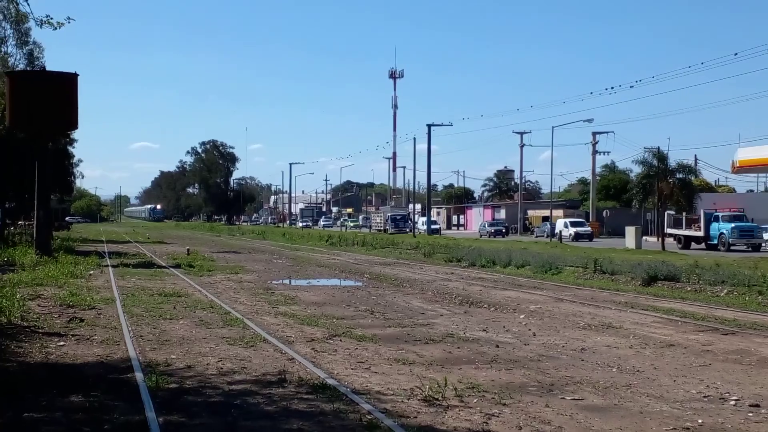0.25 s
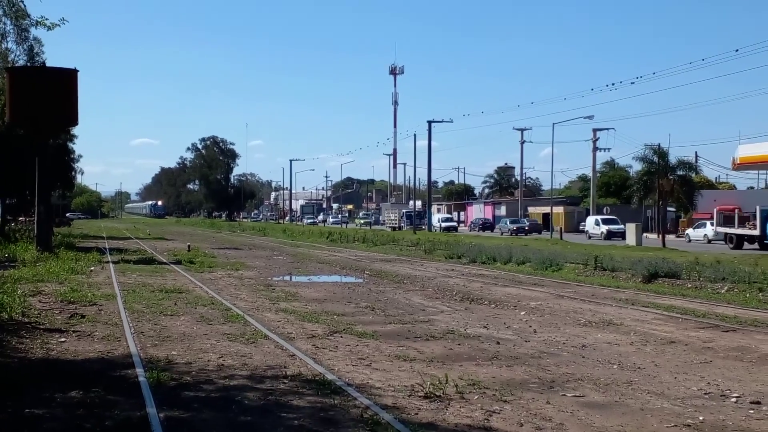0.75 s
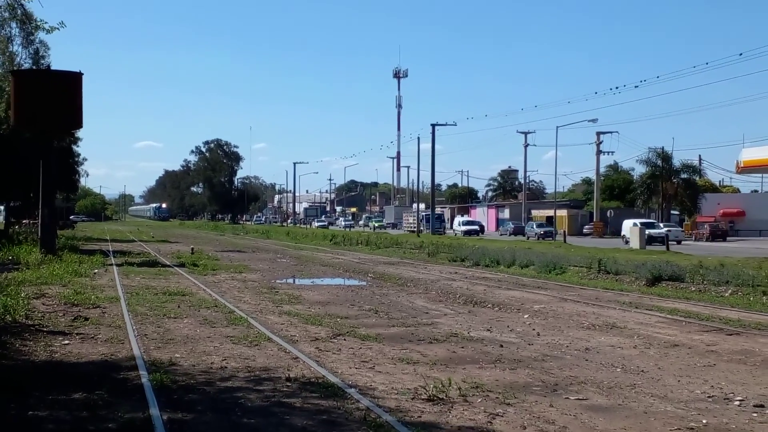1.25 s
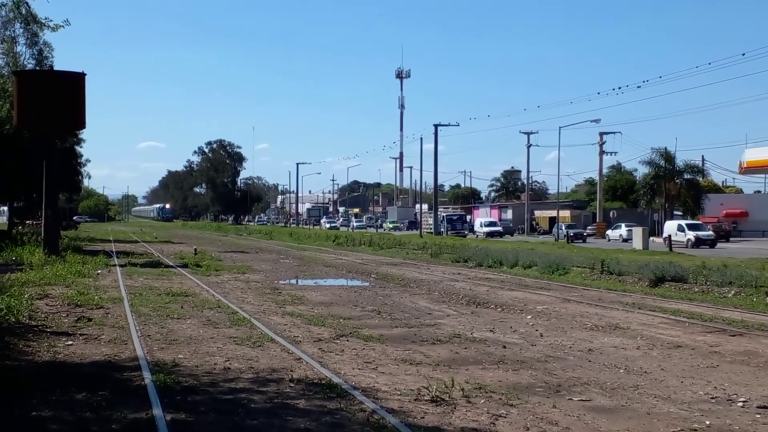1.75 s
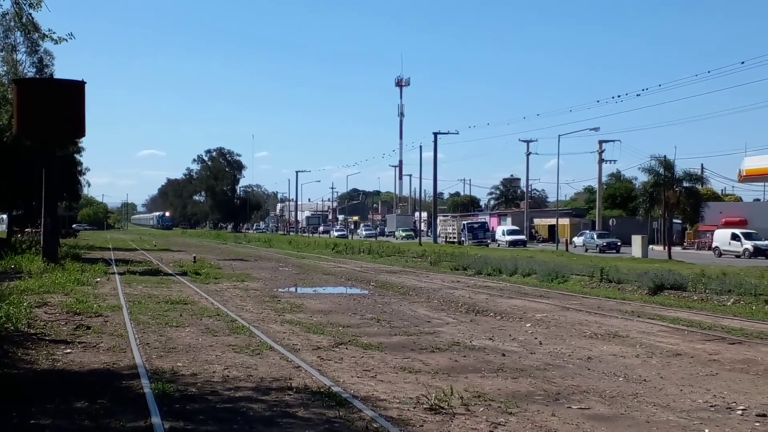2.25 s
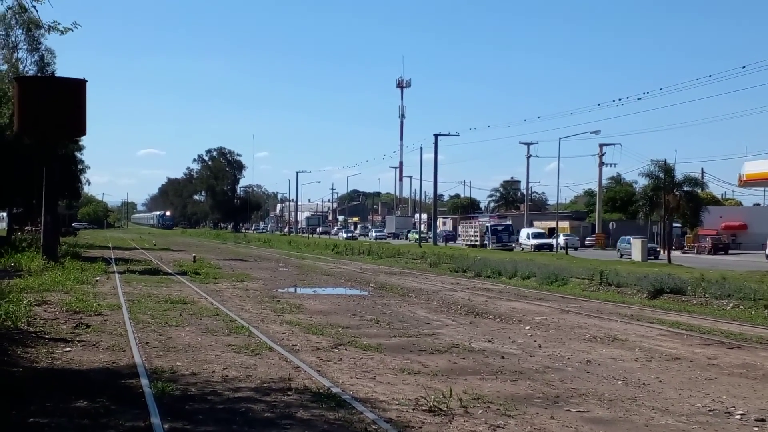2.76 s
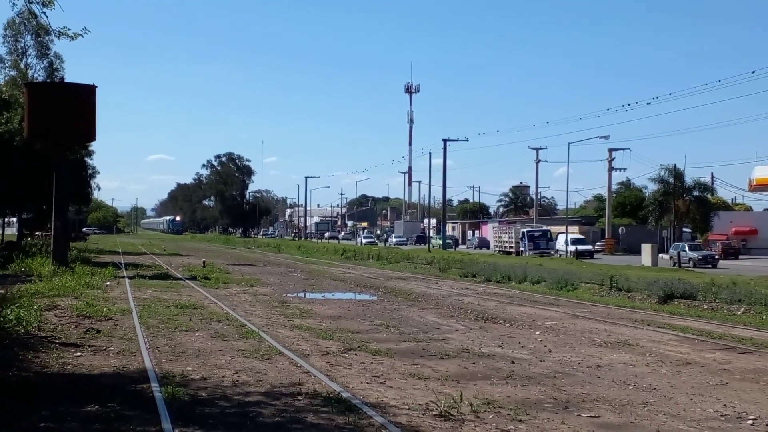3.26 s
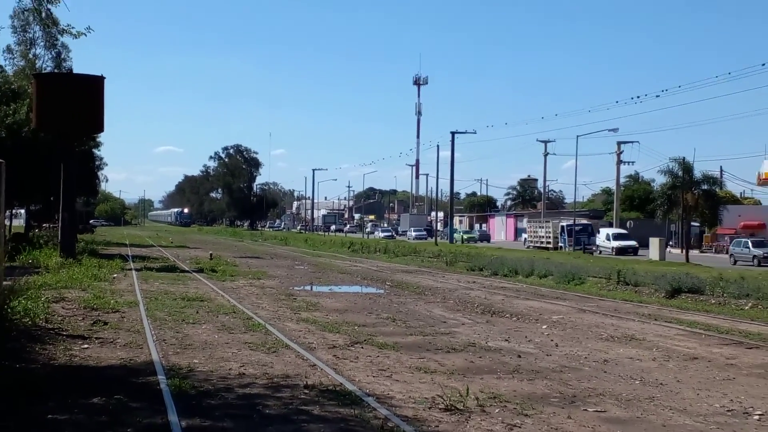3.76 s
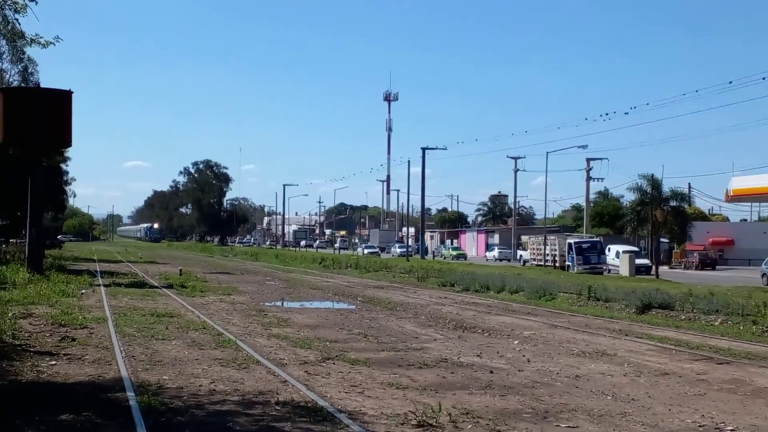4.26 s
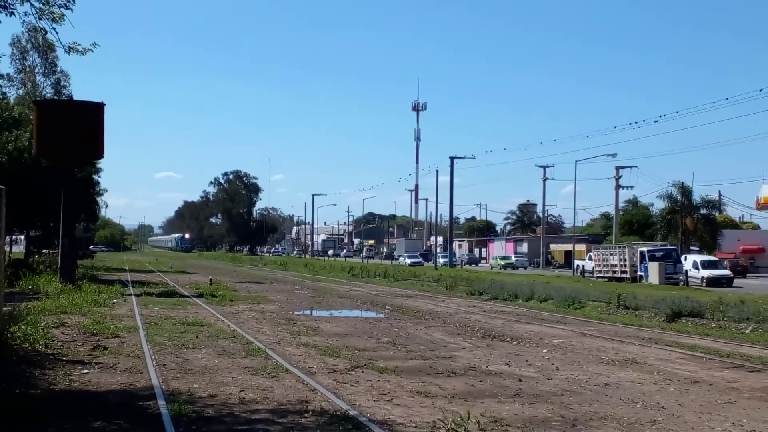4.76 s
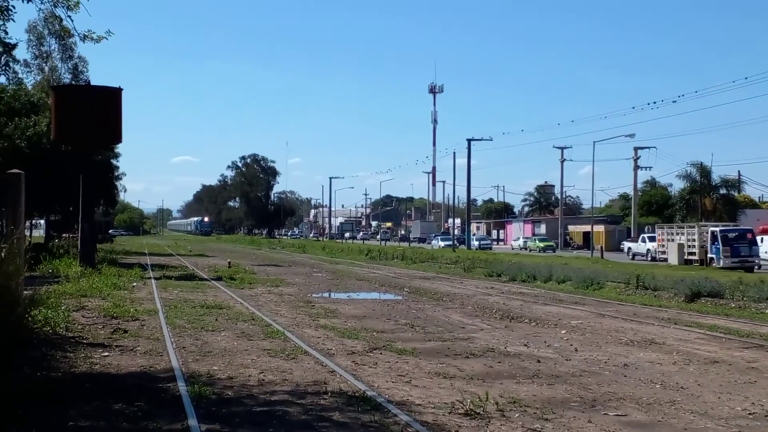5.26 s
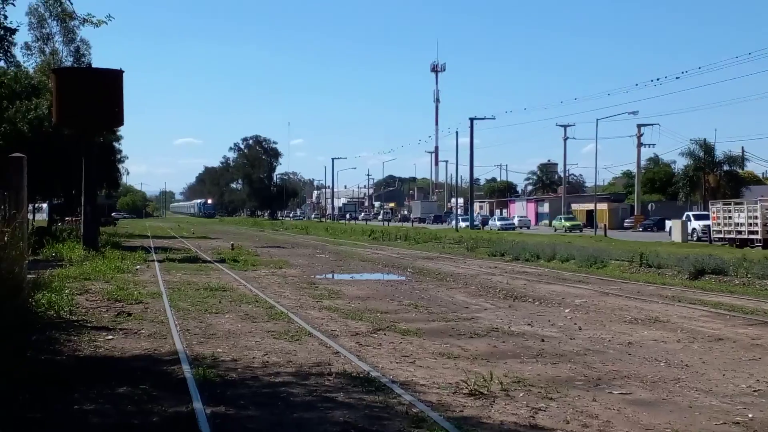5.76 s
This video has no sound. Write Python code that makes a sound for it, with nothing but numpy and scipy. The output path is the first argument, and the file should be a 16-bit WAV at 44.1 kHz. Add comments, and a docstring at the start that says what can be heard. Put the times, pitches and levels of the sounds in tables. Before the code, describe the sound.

Busy road traffic with a low diesel rumble, a fading horn, a squealing brake, then wind gusts thumping the microphone as a truck approaches.

```python
"""A busy road across open ground: shaped noise makes tyre roar, and a diesel idles on crank multiples.
At first a car horn's partials die away; then come faint chirps, rustles and a brake squealing on one mode.
Hiss pulses as a diesel clatters by, and a second brake tone whistles thinly.
In the second half two gusts buffet the microphone with flutter, gliding eddies and sharp pressure kicks.
A truck draws near as swelling noise, with a bright rush, a puff of air and at the end a climbing note."""
import sys
import numpy as np
from scipy import signal
from scipy.fft import rfft, irfft
from scipy.io import wavfile

SR = 44100
rng = np.random.default_rng(int(sys.argv[2]) if len(sys.argv) > 2 else 0)


def generate_wav(sig):
    """Save sig (samples, or channels by samples) to the path in sys.argv[1] as 16-bit PCM at SR."""
    pcm = np.round(np.clip(np.atleast_2d(sig).T, -1, 1) * 32767).astype(np.int16)
    wavfile.write(sys.argv[1], SR, pcm)


N = 264600
TIME = np.arange(N) / SR


def from_db(db):
    """Amplitude ratio: twenty decibels are a factor of ten."""
    return 10 ** (np.asarray(db) / 20)


def rms_one(x):
    """Normalisation: mean power becomes 1."""
    return x / np.sqrt(np.mean(x ** 2) + 1e-20)


def in_time(rows):
    """Linear interpolation: each column of a curve at every sample."""
    s, *columns = np.transpose(rows)
    return [np.interp(TIME, s, c) for c in columns]


def drift(rate):
    """Low-passed noise: a smooth random wander of spread 1, about this many turns a second."""
    step = 40  # the wander is computed at every 40th sample
    settling = 2000
    pole = np.exp(-2 * np.pi * rate * step / SR)
    white = rng.standard_normal(N // step + settling + 2)
    slow = signal.lfilter([1], [1, -2 * pole, pole * pole], white)[settling:]
    return np.interp(np.arange(N) / step, np.arange(len(slow)), rms_one(slow))


def noise(spectrum):
    """Spectral shaping: noise of a given colour, rms 1, falling steeply outside the listed range."""
    hz, db = np.transpose(spectrum)
    f = np.maximum(np.arange(N // 2 + 1) * SR / N, 1)
    low_skirt = 1 / (1 + (hz[0] / f / np.sqrt(2)) ** 4)
    high_skirt = 1 / (1 + (f / hz[-1] / np.sqrt(2)) ** 4)
    gain = from_db(np.interp(np.log(f), np.log(hz), db)) * low_skirt * high_skirt
    return rms_one(irfft(rfft(rng.standard_normal(N)) * gain, N))


def tone(hz):
    """Phase is the integral of frequency: a sine of rms 1 that follows a pitch curve."""
    turns = np.cumsum(hz * np.ones(N)) / SR + rng.random()
    return np.sqrt(2) * np.sin(2 * np.pi * turns)


def coloured_swell(gain, spectrum, waver_db):
    """Amplitude modulation: noise of one colour at a wavering gain."""
    return gain * from_db(waver_db * drift(13.6)) * noise(spectrum)


def swell(start_s, attack_s, hold_s, release_db_per_s):
    """Envelope: a gain rises smoothly to 1, holds and decays exponentially."""
    age = TIME - start_s
    rise = np.sin(np.pi / 2 * np.clip(age / attack_s, 0, 1)) ** 2
    return rise * from_db(-release_db_per_s * np.maximum(age - attack_s - hold_s, 0))


def bell(centre_s, width_s):
    """Gaussian envelope: a gain rises to 1 at its centre and falls alike on both sides."""
    return np.exp(-((TIME - centre_s) / width_s) ** 2)


def shimmer(x, depth_db, count):
    """Turbulent scattering: moving air lets each narrow band swell and fade by itself."""
    spectrum, out = rfft(x), 0
    log_hz = np.log(np.arange(len(spectrum)) * SR / N + 1)
    place = np.interp(log_hz, np.log([500, 16000]), [0, count - 1])
    for k in range(count):
        band = irfft(spectrum * np.maximum(1 - np.abs(place - k), 0), N)
        out = out + band * from_db(depth_db * drift(7.7))
    return rms_one(out)


# faint airy top, shared by the background and the leaf ticks: frequency_hz, relative_db_per_hz
AIR = [(8500, 3), (11000, -2.5), (13500, 1.5), (15500, -2.5)]


def airy_noise():
    """Broadband turbulence: noise in the top octave, rms 1."""
    return noise(AIR)


# two-note horn: partial_hz, level_db (before the horn's common level and fade)
HORN = [(994.5, -36), (1484, -49.5), (1873, -58), (1905, -52.5), (1983, -48.5), (2384, -54.5),
        (2477, -53.5), (2940, -64), (3483, -66)]
# echo of the released horn: time_s, fade_db
HORN_FADE = [(.02, 0), (.07, -2.5), (.11, -1.5), (.14, -5), (.19, -8.5), (.27, -17), (.35, -28), (.7, -60)]


def horn(level_db, waver_db, wander):
    """Additive synthesis: reed partials fade together, each slightly blurred on its way through the air."""
    partials = 0
    for hz, db in HORN:
        blurred_hz = hz * (1 + wander * drift(30))
        partials = partials + from_db(db + waver_db * drift(24)) * tone(blurred_hz)
    return from_db(level_db + in_time(HORN_FADE)[0]) * partials


# loudness shared by the idling diesel and the rumble: time_s, relative_db
ENGINE_LOUDNESS = [(0, -1.5), (.6, -.5), (3.5, -1), (4.4, -5), (5.5, -2), (6, -4.5)]


def engine_gain():
    """Common envelope: the engines' loudness as a gain."""
    return from_db(in_time(ENGINE_LOUDNESS)[0])


# idling diesel: multiple of the crank rate, level_db (before the engine loudness)
ENGINE_ORDERS = [(6, -36), (11, -34), (12, -34.5), (13, -35.5), (15, -57.5), (18, -41), (24, -48),
                 (31, -63.5)]
CRANK_HZ = 11.13
BOOM_ORDER = 9  # the strongest order, which booms in the exhaust pipe


def idling_diesel(boom_db, lurch, half_lurch, throb, speed_wander, waver_db, order_wander_hz):
    """Engine orders: tones sit on crank multiples, and uneven turning warbles the boom."""
    crank = CRANK_HZ * (1 + speed_wander * drift(1))
    uneven = crank * (1 + lurch * tone(crank) + half_lurch * tone(2 * crank))
    firing = tone(3 * crank)
    boom_gain = from_db(boom_db + waver_db * drift(2.5)) * (1 + throb * firing)
    exhaust = boom_gain * tone(BOOM_ORDER * uneven)
    for order, db in ENGINE_ORDERS:
        order_hz = order * crank + order_wander_hz * drift(1.44)
        exhaust = exhaust + from_db(db + waver_db * drift(2.7)) * tone(order_hz)
    return engine_gain() * exhaust


# colour of the rumble: frequency_hz, relative_db_per_hz
RUMBLE = [(37, -22.5), (42, -11.5), (52, -5), (65, 3), (100, -1.5), (150, -1), (180, -9), (270, -4.5),
          (350, -11.5), (450, -19), (800, -30.5)]


def engine_rumble(level_db):
    """Incoherent sum: many engines together make low noise that follows the engine loudness."""
    return coloured_swell(from_db(level_db) * engine_gain(), RUMBLE, waver_db=1.54)


# vehicles going by: nearest_s, time to come or go by 3 dB (s; its sign is ignored),
# roar_db (before the common tyre lift), hiss_db
PASSES = [(1.1, 1.5, -42.5, -61.5), (2.0, 0.66, -42, -52.5), (3.07, 0.26, -41.5, -52),
          (4.35, 0.2, -48, -53.5), (5.43, -0.83, -50.5, -59)]
FAR_ROAR_DB, FAR_HISS_DB = -44, -59.5  # far traffic; the roar is before the common tyre lift


def traffic_gains():
    """Inverse-square law: each vehicle's power falls with distance squared, on top of far traffic."""
    roar_power, hiss_power = from_db(FAR_ROAR_DB) ** 2, from_db(FAR_HISS_DB) ** 2
    for s, width_s, roar_db, hiss_db in PASSES:
        nearness = 1 / (1 + ((TIME - s) / width_s) ** 2)
        roar_power = roar_power + nearness * from_db(roar_db) ** 2
        hiss_power = hiss_power + nearness * from_db(hiss_db) ** 2
    return np.sqrt(roar_power), np.sqrt(hiss_power)


# colour of tyre roar: frequency_hz, relative_db_per_hz
TYRES = [(200, -10.5), (450, 2), (750, 0), (1000, 0), (1220, 1), (1600, -2), (1950, -0.5), (2200, -6),
         (2450, -7), (2800, -17.5), (4000, -37), (6000, -38.5)]
# colour of hiss: frequency_hz, relative_db_per_hz
HISS = [(1500, -4.5), (3000, 4), (3700, 0.5), (4300, -2.5), (5000, -10), (5800, -6.5), (6500, -10.5),
        (7300, -6.5), (8000, -16), (11000, -23.5), (14000, -19.5), (16000, -21)]
KNOCK_HZ, KNOCK_AT_S = 11.68, 2.003  # knock rate and the start of one knock
KNOCK_RISE_S, KNOCK_SPREAD_DB = .008, 2.0


def passing_vehicles(tyre_db, air_db, shimmer_db, knock_depth, knock_decay_s):
    """Periodic modulation: beside steady tyre roar, hiss pulses with a diesel's loudest cylinder."""
    roar_gain, hiss_gain = traffic_gains()
    roar = roar_gain * from_db(tyre_db) * shimmer(noise(TYRES), shimmer_db, count=24)
    age = (TIME - KNOCK_AT_S) % (1 / KNOCK_HZ)
    knocks = (1 - np.exp(-age / KNOCK_RISE_S)) * np.exp(-age / knock_decay_s)
    knocks = knocks * from_db(KNOCK_SPREAD_DB * drift(7.2))
    pulses = rms_one(1 + knock_depth * knocks)
    hiss = hiss_gain * pulses * shimmer(noise(HISS), shimmer_db, count=24)
    air = from_db(air_db + shimmer_db * drift(10)) * airy_noise()
    return roar + hiss + air


# colour of the trucks' drone: frequency_hz, relative_db_per_hz
DRONE = [(250, -5.5), (300, 0), (345, -0.5), (400, -8.5), (470, -16.5)]


def truck_drone(far_db, near_db, rev_db):
    """Amplitude envelope: far drone grows as a truck draws near, then as it opens its throttle."""
    nearing = swell(start_s=3.98, attack_s=0.69, hold_s=0.99, release_db_per_s=25)
    throttle = swell(start_s=5.74, attack_s=0.24, hold_s=.1, release_db_per_s=20)
    gain = from_db(far_db) + from_db(near_db) * nearing + from_db(rev_db) * throttle
    return coloured_swell(gain, DRONE, waver_db=4.0)


# gusts at the microphone: start_s, hold_s, flutter_db, slow_pressure_db
GUSTS = [(1.296, 0.38, -47.5, -29), (2.9, 0.25, -42.5, -33), (3.24, 0.69, -29.5, -29),
         (4.797, 0.32, -34, -28), (5.3, 0.15, -41, -29)]
GUST_ATTACK_S, GUST_RELEASE_DB_PER_S = 0.17, 90.5
CALM_FLUTTER_DB, CALM_SWAY_DB = -50.5, -52


def wind_gains():
    """Power addition: each gust swells over the calm in flutter and in slow pressure."""
    flutter, sway = from_db(CALM_FLUTTER_DB), from_db(CALM_SWAY_DB)
    for s, hold_s, flutter_db, sway_db in GUSTS:
        gust = swell(s, GUST_ATTACK_S, hold_s, GUST_RELEASE_DB_PER_S)
        flutter = np.hypot(flutter, from_db(flutter_db) * gust)
        sway = np.hypot(sway, from_db(sway_db) * gust)
    return flutter, sway


TYPICAL_EDDY_HZ, TYPICAL_EDDY_S = 250, .01
WEAK_EDDIES_PER_S = 18
WEAK_EDDY_DB, WEAK_EDDY_SPREAD_DB = 8, 3.5  # above the flutter


def weak_eddies(flutter):
    """Random turbulence: rows of centre_s, peak_db, pitch_hz, length_s, glide_octaves follow the wind."""
    count = int(WEAK_EDDIES_PER_S * N / SR)
    when, strength, pitch, length, glide = rng.uniform(-1.2, 1, (count, 5)).T
    s = (np.arange(count) + .5 + .5 * when) / WEAK_EDDIES_PER_S
    wind_db = 20 * np.log10(np.interp(s, TIME, flutter))
    db = wind_db + WEAK_EDDY_DB + WEAK_EDDY_SPREAD_DB * strength
    hz = TYPICAL_EDDY_HZ * 2 ** (.5 * pitch)
    length_s = TYPICAL_EDDY_S * 2 ** length
    return list(zip(s, db, hz, length_s, .5 * glide))


# the strongest eddies: centre_s, peak_db, pitch_hz, length_s, glide (octaves over that length)
EDDIES = [(3.342, -10.5, 259.2, .012, -.2), (3.353, -11, 236, .015, -.5), (3.431, -16, 151, .009, 0),
          (3.494, -12.5, 120, .016, 0), (3.544, -13.5, 287.6, .012, 0), (3.584, -8.5, 229.7, .015, -.3),
          (3.651, -11.5, 281.4, .014, -.2), (3.671, -14, 230, .014, -.2), (3.699, -9, 134.7, .017, .2),
          (3.717, -11.5, 235, 0.017, .2), (3.836, -13.5, 110, .014, -.3), (3.869, -15.5, 369, .016, .2),
          (3.925, -18, 302, 0.0085, 0), (4.058, -7, 310.5, 0.012, 0), (4.077, -11, 136, .012, -.5),
          (4.11, -16, 288, .024, -.4), (4.802, -18, 343, 0.013, -.2), (4.814, -10, 138, .011, 0),
          (4.923, -19.5, 392, .027, .3), (4.955, -20.5, 381, 0.023, -.2), (5.041, -14.5, 329, .013, -.4),
          (5.056, -10.5, 136, .016, -.3), (5.08, -12, 163, 0.008, 0), (5.184, -12.5, 442, 0.012, -.15),
          (5.221, -11, 303.7, .017, .25), (5.291, -10, 125.3, .013, 0.0044)]
# a ripple's level relative to its eddy's peak grows with pitch and shrinks with length
RIPPLE_DB, RIPPLE_DB_PER_OCTAVE, RIPPLE_LOSS_DB_PER_DOUBLING = -18, 7, 4.5


def eddies(flutter, ripple_hz, pitch_spread, ripple_spread):
    """Vortex pressure: each eddy gives the port a few uneven, gliding swings and a faster ripple."""
    rows = EDDIES + weak_eddies(flutter)
    out, swing, fine = np.zeros(N), drift(144.0), drift(166.0)
    for (s, db, hz, length, glide), turns in zip(rows, rng.random((len(rows), 2))):
        near = np.abs(TIME - s) < 2 * length
        age = (TIME[near] - s) / length
        shape = np.exp(-(2 * age) ** 2)
        ripple_db = db + RIPPLE_DB + RIPPLE_DB_PER_OCTAVE * np.log2(hz / TYPICAL_EDDY_HZ)
        ripple_db -= RIPPLE_LOSS_DB_PER_DOUBLING * np.log2(length / TYPICAL_EDDY_S)
        main = (db, hz, pitch_spread * swing[near])
        ripple = (ripple_db, ripple_hz, ripple_spread * fine[near])
        for (peak_db, centre_hz, bend), turn in zip((main, ripple), turns):
            # taking out the mean bend keeps the eddy centred on its pitch
            pitch = centre_hz * 2 ** (glide * age) * (1 + bend - np.average(bend, weights=shape))
            out[near] += from_db(peak_db) * shape * np.sin(2 * np.pi * (np.cumsum(pitch) / SR + turn))
    return out


# colour of the flutter: frequency_hz, relative_db_per_hz
FLUTTER = [(45, -4.5), (70, 4.5), (140, 9.5), (195, -9), (300, -2.5), (470, -8), (800, -39)]
# colour of the slow pressure: frequency_hz, relative_db_per_hz
SWAY = [(40, -10.5), (48, 3.5), (65, 2.5), (90, -11.5)]


def gusts(lumpy_db):
    """Turbulent pressure: lumpy flutter, slow pressure, eddies and kicks act on the microphone."""
    flutter, sway = wind_gains()
    lumps = flutter * from_db(lumpy_db * drift(28)) * noise(FLUTTER)
    slow_pressure = coloured_swell(sway, SWAY, waver_db=3.5)
    thumps = eddies(flutter, ripple_hz=538.4, pitch_spread=0.22, ripple_spread=0.262)
    return lumps + slow_pressure + thumps + kicks()


def leaves(size_spread_db, level_db, ticks_per_s, tick_s):
    """Random impulses: dry leaves tick in the breeze as uneven, short bursts of airy noise."""
    sizes = from_db(size_spread_db * np.minimum(rng.exponential(1, N), 3))
    ticks = (rng.random(N) < ticks_per_s / SR) * sizes
    bursts = signal.lfilter([1], [1, -np.exp(-1 / (tick_s * SR))], ticks + 1e-18)
    return from_db(level_db) * rms_one(bursts) * airy_noise()


# bird chirps: centre_s, pitch_hz, level_db
CHIRPS = [(1.48, 3520, -47.5), (4.54, 6900, -54), (5.058, 6500, -57), (5.81, 6850, -62.5)]


def birds(length_s, wander):
    """Frequency jitter: short high tones sound slightly rough."""
    out = 0
    for s, hz, db in CHIRPS:
        out = out + from_db(db) * bell(s, length_s) * tone(hz * (1 + wander * drift(99)))
    return out


# rustles of leaves and grass: centre_s, level_db, band_centre_hz, length_s
RUSTLES = [(1.6, -56, 5970, 0.016), (1.87, -66, 12000, .05), (2.25, -61, 11000, 0.031),
           (3.102, -66, 9000, 0.035), (4.32, -60, 8000, 0.027), (4.41, -61, 9000, .018),
           (4.77, -63, 11500, .018), (4.915, -57, 11500, .022), (5.455, -63, 7500, .025)]


def rustles(grain_db):
    """Many small contacts: brushing leaves and grass give grainy swells, each an octave wide."""
    out = np.zeros(N)
    grains = rng.standard_normal(N) * from_db(grain_db * drift(150))
    for s, db, hz, length_s in RUSTLES:
        edges = [hz / np.sqrt(2), hz * np.sqrt(2)]
        band = signal.butter(2, edges, "band", fs=SR, output="sos")
        out += from_db(db) * bell(s, length_s) * rms_one(signal.sosfilt(band, grains))
    return out


def rubbed_brake(gain, hz, overtones, waver_db):
    """Friction-driven vibration: a rubbed brake sings on one mode, with unsteady grip."""
    hz = hz * (1 + .0012 * drift(70))
    partials = sum(from_db(db) * tone(multiple * hz) for multiple, db in overtones)
    return gain * from_db(waver_db * drift(38)) * partials


# squeal, which sharpens as it lets go: time_s, pitch_hz, level_db
SQUEAL = [(1.66, 2320, -56), (1.68, 2307, -39.5), (1.75, 2310, -36.5), (1.785, 2302, -30),
          (1.825, 2304, -31.5), (1.868, 2310, -30), (1.955, 2297, -37.5), (1.985, 2307, -33),
          (2.05, 2307, -33.5), (2.13, 2290, -33), (2.195, 2346, -38), (2.22, 2325, -34),
          (2.255, 2323, -31.5), (2.275, 2340, -40.5), (2.32, 2350, -47)]
# its overtones: multiple, relative_db
SQUEAL_TONES = [(1, 0), (2, -33.5), (3, -36)]


def brake_squeal(echo_db_per_s):
    """Self-sustained vibration: one brake squeals, and its echo decays exponentially."""
    hz, db = in_time(SQUEAL)
    echo_db = -echo_db_per_s * np.maximum(TIME - SQUEAL[-1][0], 0)
    gain = (TIME > SQUEAL[0][0]) * from_db(db + echo_db)
    return rubbed_brake(gain, hz, SQUEAL_TONES, waver_db=1.4)


# a thin, very high brake whistle, one row per squeeze: start_s, hold_s, level_db
WHISTLES = [(2.898, .12, -74.5), (3.32, .25, -73)]


def brake_whistle(start_hz, sag_hz_per_s):
    """Single-mode vibration: two squeezes sound one slowly sinking whistle."""
    squeezes = 0
    for s, hold_s, db in WHISTLES:
        squeezes = squeezes + from_db(db) * swell(s, .08, hold_s, release_db_per_s=108)
    hz = start_hz - sag_hz_per_s * (TIME - WHISTLES[0][0])
    return rubbed_brake(squeezes, hz, [(1, 0)], waver_db=4.5)


# sharp kicks of air: centre_s, dip_db (before rebound and port), width_s, rebound_hz
KICKS = [(3.1586, -10, 0.0005, 220), (3.211, -10, 0.00054, 280), (3.2292, -3.5, 0.00049, 260),
         (3.2419, -6.5, .00045, 280), (3.335, -3.5, 0.00034, 260), (3.343, -0.5, 0.00052, 200),
         (3.394, 1, 0.00054, 150), (3.4008, 0.5, 0.00057, 149), (3.4523, 3, 0.00051, 280),
         (3.5125, -9, 0.00053, 180), (3.5762, -3.5, 0.00076, 200), (3.6434, -9.5, 0.00061, 259),
         (3.6926, -6.5, 0.0005, 170), (3.7187, -1.5, 0.00053, 230), (3.815, 1, 0.00063, 201),
         (3.867, -10, 0.00045, 420), (3.94, -13, 0.00043, 300), (4.0003, -10, .0005, 240),
         (4.0195, -10, 0.00042, 340), (4.045, 0, .00051, 260), (4.0561, 1, 0.00049, 322),
         (4.07, -5, .00042, 260), (4.1194, -10.5, .00043, 278), (4.9135, -10, 0.0005, 380),
         (5.0361, -8, 0.00037, 320), (5.0589, -6, .00059, 200), (5.1267, -1.5, 0.00052, 147),
         (5.2146, -9, 0.00047, 300), (5.227, -7.5, 0.00031, 340), (5.2838, -2, 0.00046, 123),
         (5.5614, 2, 0.00044, 253)]
REBOUND_Q, PORT_CUT_HZ = 1.32, 900  # how long the air swings back; dullness of the microphone's port


def kicks():
    """Damped resonance: narrow pressure dips swing back as thumps or snaps, dulled by the port."""
    out = np.zeros(N)
    for s, db, width_s, rebound_hz in KICKS:
        near = np.abs(TIME - s) < .03
        dip = -from_db(db) / np.cosh((TIME[near] - s) / width_s)
        w = 2 * np.pi * rebound_hz
        rebound = signal.bilinear([1, 0, 0], [1, w / REBOUND_Q, w * w], SR)
        out[near] += signal.lfilter(*rebound, dip)
    port = signal.butter(4, PORT_CUT_HZ, fs=SR, output="sos")
    return signal.sosfilt(port, out + 1e-18)


# colour of the rush: frequency_hz, relative_db_per_hz
RUSH = [(1900, 8.5), (2400, 5), (3200, -7.5), (5000, -13), (7300, -17.5), (8500, -20), (12500, -24.5),
        (15500, -35)]
# brief surges of the rush: centre_s, level_db
SURGES = [(4.127, -40.5), (4.165, -42.5), (4.238, -38.5), (4.495, -43.5), (4.715, -43), (4.84, -44),
          (4.93, -44)]
# colour of the surges, with the tyres' 2 kHz band: frequency_hz, relative_db_per_hz
SURGE_COLOUR = [(1500, 2.5), (2000, 9), (3000, -3.5), (5000, -18), (12000, -33)]


def bright_rush(level_db, length_s, grain_db):
    """Modulated broadband noise: the nearest vehicles' rush has duller surges and a rough grain."""
    surges = sum(from_db(db) * bell(s, length_s) for s, db in SURGES)
    envelope = swell(start_s=4.05, attack_s=0.11, hold_s=0.37, release_db_per_s=22)
    rush = from_db(level_db) * envelope * noise(RUSH)
    return (rush + surges * noise(SURGE_COLOUR)) * from_db(grain_db * drift(120))


# colour of the puff: frequency_hz, relative_db_per_hz
PUFF = [(450, 9), (700, 4.5), (1100, -17), (2000, -2.5), (3000, -14), (5000, -23.5), (7200, -20.5),
        (8500, -35.5), (14000, -38)]


def air_puff(level_db):
    """Jet noise: a short puff of compressed air is a burst of shaped noise."""
    envelope = swell(start_s=4.615, attack_s=0.035, hold_s=0.054, release_db_per_s=56)
    return coloured_swell(from_db(level_db) * envelope, PUFF, waver_db=0.5)


# the truck's exhaust note: time_s, pitch_hz, level_db
REV_NOTE = [(5.8, 236, -50), (5.84, 262.7, -32), (5.89, 334.4, -39), (6, 329, -30.5)]


def revving_note(wander):
    """Frequency modulation: the nearing truck's exhaust note climbs and steadies."""
    hz, db = in_time(REV_NOTE)
    return (TIME > REV_NOTE[0][0]) * from_db(db) * tone(hz * (1 + wander * drift(40.5)))


def scene():
    """Superposition: the pressures of road, signals and wind add."""
    road = idling_diesel(boom_db=-22.0, lurch=0.042, half_lurch=0.035, throb=0.21,
                         speed_wander=0.002105, waver_db=1.0, order_wander_hz=0.31)
    road = road + engine_rumble(level_db=-27)
    road = road + passing_vehicles(tyre_db=2.5, air_db=-70, shimmer_db=1.0171,
                                   knock_depth=1.0, knock_decay_s=0.018)
    road = road + truck_drone(far_db=-46.5, near_db=-44.5, rev_db=-38)
    road = road + bright_rush(level_db=-46.5, length_s=0.017, grain_db=2.5)
    road = road + air_puff(level_db=-36) + revving_note(wander=0.0256)
    signals = horn(level_db=3.0, waver_db=2.0, wander=.0013) + birds(length_s=0.0092, wander=0.021)
    signals = signals + brake_squeal(echo_db_per_s=92) + brake_whistle(start_hz=13540, sag_hz_per_s=130)
    wind = gusts(lumpy_db=4.2) + rustles(grain_db=4.5)
    wind = wind + leaves(size_spread_db=3.5, level_db=-75, ticks_per_s=25, tick_s=.003)
    return (road + signals + wind)[None, :]


def record(dry):
    """Band limiting and saturation: bass and top are cut, peaks rounded, and the ends faded."""
    bass_cut = signal.butter(3, 30, "high", fs=SR, output="sos")
    thinned = signal.sosfilt(bass_cut, dry)
    rounded = thinned / (1 + thinned ** 8) ** (1 / 8)
    from_nearest_end = np.minimum(TIME, TIME[-1] - TIME)
    ends = np.sin(np.pi / 2 * np.minimum(from_nearest_end / .004, 1)) ** 2
    top_cut = signal.ellip(12, .1, 90, 15750, fs=SR, output="sos")
    return signal.sosfilt(top_cut, rounded * ends)


dry = scene()
out = record(dry)
generate_wav(out)
```